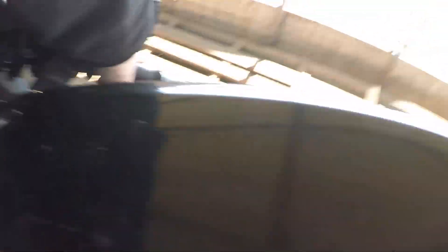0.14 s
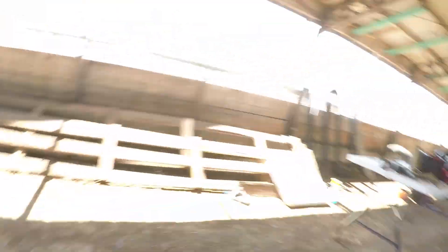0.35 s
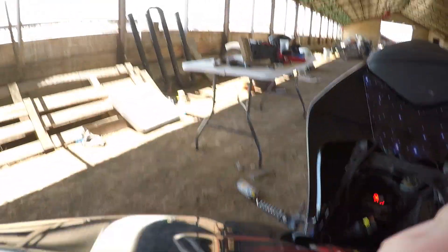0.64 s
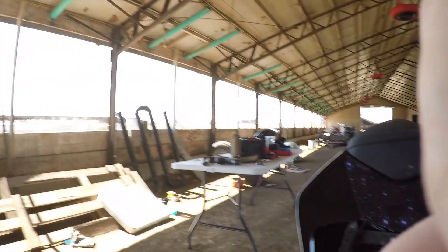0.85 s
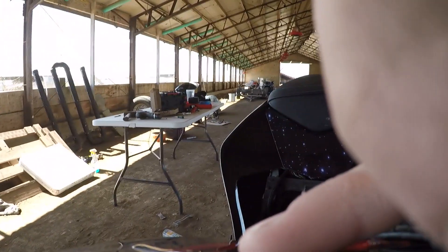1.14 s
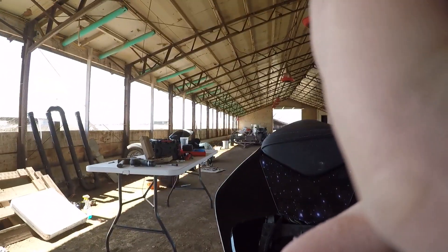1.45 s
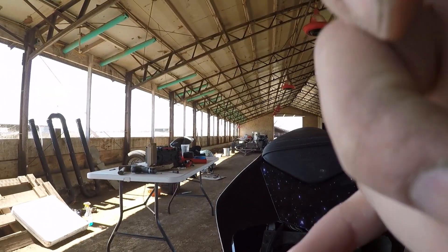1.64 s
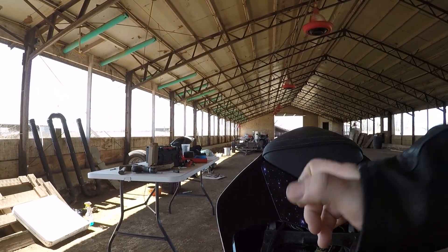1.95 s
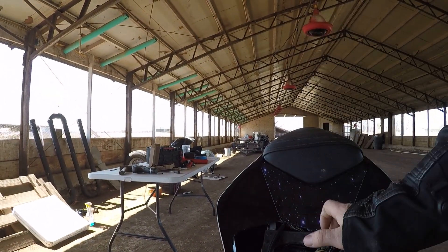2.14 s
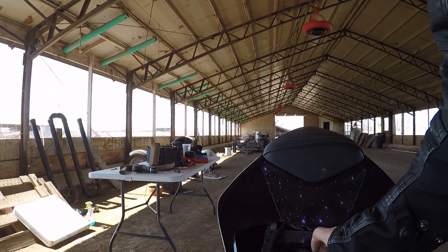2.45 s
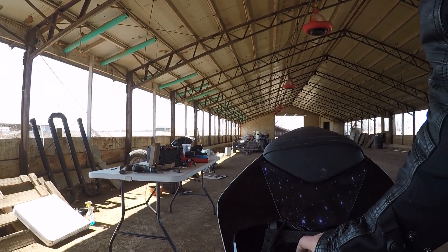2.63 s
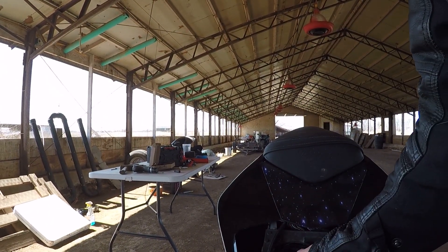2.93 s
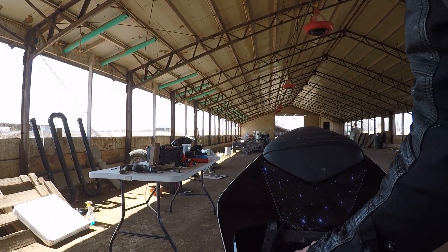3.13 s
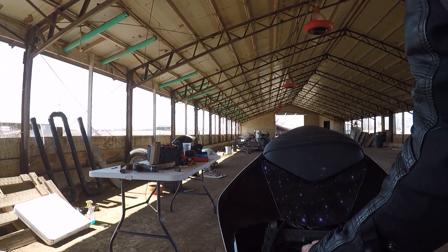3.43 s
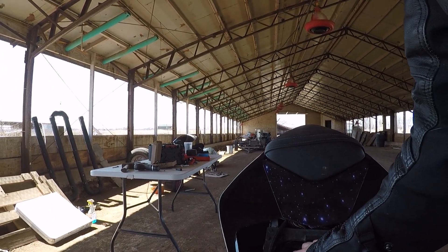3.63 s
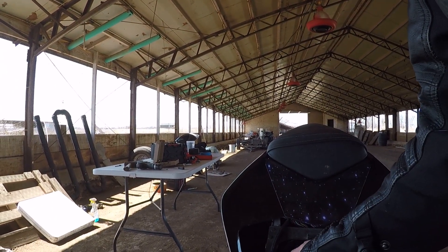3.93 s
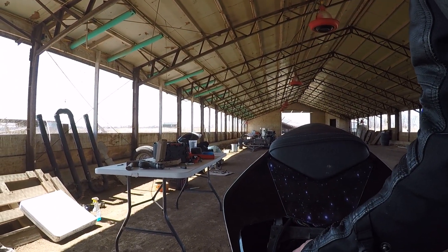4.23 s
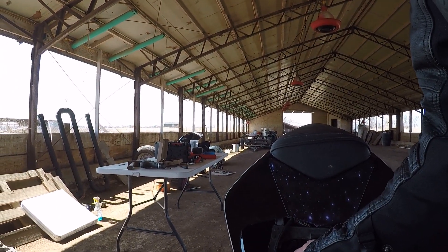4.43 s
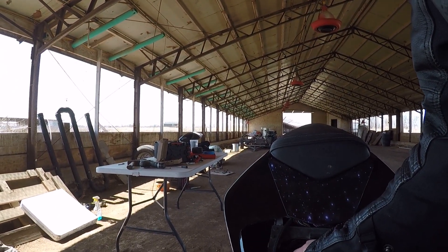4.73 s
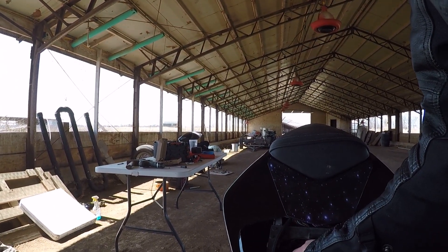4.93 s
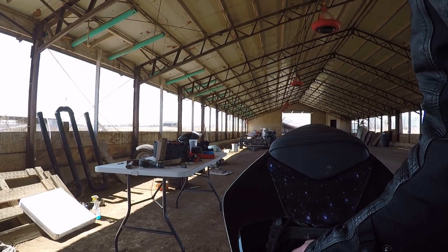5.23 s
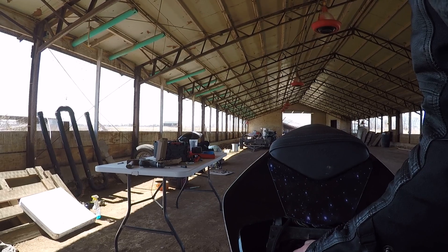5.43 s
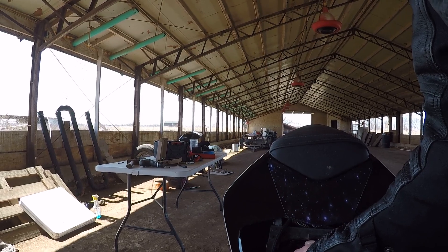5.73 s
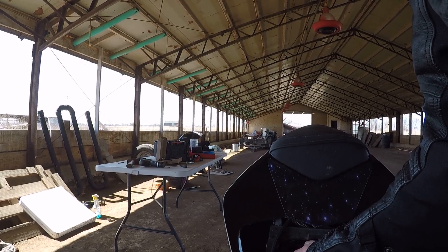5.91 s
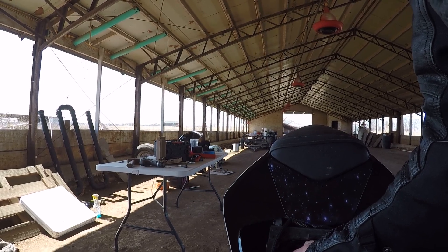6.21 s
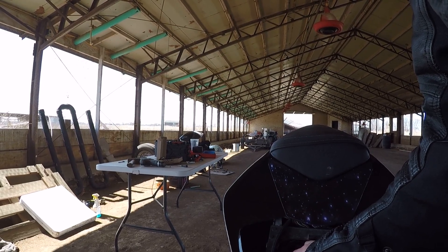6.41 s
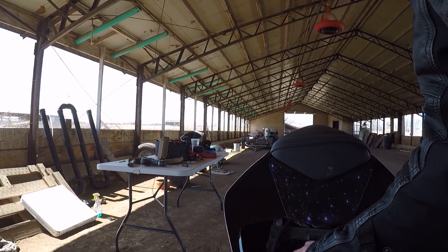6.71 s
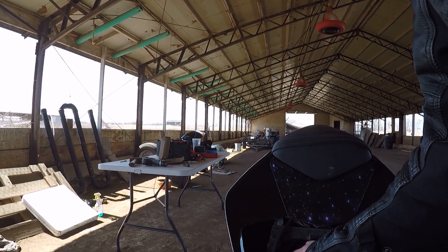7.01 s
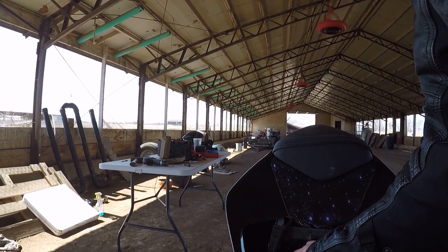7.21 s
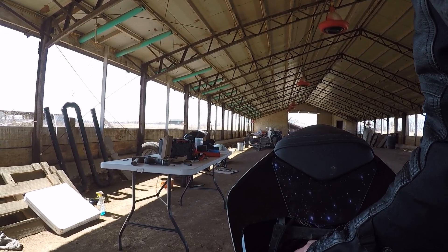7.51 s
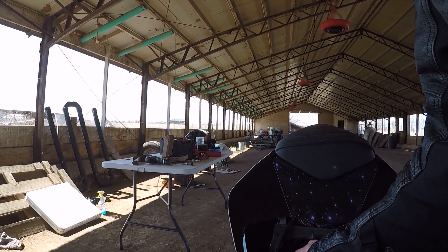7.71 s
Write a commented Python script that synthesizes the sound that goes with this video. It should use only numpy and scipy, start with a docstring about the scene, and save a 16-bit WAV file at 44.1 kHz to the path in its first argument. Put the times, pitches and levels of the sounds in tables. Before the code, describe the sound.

A four-cylinder motorcycle is already running at 0 seconds and holds a fast idle of about 3700 rpm to the end, near 7.8 seconds, with only tiny wavers in pitch. The strongest tone is a low hum near 123 Hz, roughened by uneven burble, a loose lope and a dull, dark wash from the long open barn. Softer rasp, piston knock, valve tick, gear whirr and faint whine sit above it. Until about 0.55 seconds air rumbles on the turning microphone, fading by 0.7; a sleeve swishes at 0.19. From 0.7 to 0.81 cloth crackles and a dense flurry of sharp, dry clicks strikes the housing, strongest near 0.74. A very faint brush comes at 1.07. The clatter opens up around 1.4 seconds, stays clearest until about 3.4, then gradually softens a little. The engine never revs up or stops.

```python
"""The exhaust of a four-cylinder motorcycle drones at a steady fast idle, about 3700 rpm, in a long open barn,
heard from the rider's seat: a sum of crank orders, with a burble of uneven burns that ring the pipe and the barn.
Above it noise bursts locked to the crank make rasp, piston knock and valve tick, over gear whirr and whine.
Early on the microphone is swung round and air buffets it; a sleeve brushes it in short strokes of coloured noise,
and the cuff clicks on the housing as cracks with very short rings."""
import sys
import numpy as np
from scipy import signal
from scipy.fft import rfft, irfft
from scipy.io import wavfile
from scipy.ndimage import uniform_filter1d, minimum_filter1d

SR = 44100
rng = np.random.default_rng(int(sys.argv[2]) if len(sys.argv) > 2 else 0)


def generate_wav(signal):
    """Clip the signal to [-1, 1] and save it as 16-bit WAV at the path in sys.argv[1]."""
    frames = np.transpose(np.atleast_2d(signal))
    scaled = np.clip(frames, -1, 1) * 32767
    pcm = np.round(scaled).astype(np.int16)
    wavfile.write(sys.argv[1], SR, pcm)


N = 346626

# Mean crankshaft speed. Each row: time in seconds, speed in turns per second.
CRANK_SPEED = [(0.0, 63.15), (0.53, 62.12), (0.8, 62.65), (1.01, 61.7), (1.19, 62.04), (2.35, 60.71),
               (2.61, 61.57), (2.85, 61.36), (4.28, 61.49), (4.38, 60.4), (4.76, 61.58), (5.7, 61.29),
               (5.87, 60.69), (6.02, 61.31), (6.18, 61.05), (6.5, 62.3), (7.54, 62.16), (7.85, 61.41)]
# Orders of the steady exhaust note. Each row: multiple of the crank rate, level in dB within its register.
NOTE_ORDERS = [(0.5, -42), (1, -13), (1.5, -8.5), (2, 4), (2.5, -11), (3, -9.5), (3.5, -26), (4, -18.5),
               (4.5, -23), (5, -8.5), (5.5, -42), (6, -5.5), (6.5, -36), (7, -22), (7.5, -36), (8, -17),
               (8.5, -32), (9, -61.5), (9.5, -23.5), (10, -12.5), (10.5, -31.5), (11, -38), (11.5, -47),
               (12, -33)]
# Faint higher orders of the note. Each row: multiple of the crank rate, level in dB within its register.
OVERTONE_ORDERS = [(14, -36.5), (16, -31), (20, -37), (24.5, -43.5)]
# Registers of the note, from the firing tone up to the overtones. Each row: level in dB, swell on the standing
# wave in dB, rise in dB per turn per second, lift in dB while the microphone faces the rear.
NOTE_REGISTERS = [(-12.0, -0.4, 0.6, -0.5), (-19.4, 2.4, 0.4, -1.5), (-24.0, -5.2, 1.2, -2.5),
                  (-30, -10, -0.8, 8.5), (-40.5, -0.5, 0.8, -2), (-42.5, -2, 1.5, -22)]
# How unevenly each cylinder burns. Each entry, in firing order: size of its surplus or lack in dB.
BURN_UNEVENNESS_DB = [-12.5, -7.5, -12, -8]
# Pipe and silencer resonances. Each row: frequency in Hz, width in Hz, relative gain in dB.
PIPE_RESONANCES = [(75.4, 20.5, 3.5), (111, 87, -6), (171.5, 18, -3.5), (226.3, 21, -14.5),
                   (253.2, 15.5, -5), (353.3, 4.1, -9.5), (451, 28, -18), (575, 14, -11.5), (626, 16, -12)]
# Side tones of the lope, a quarter order beside the crank orders. Each row: multiple of the crank rate, level in dB.
LOPE_SIDE_TONES = [(1.25, -28), (1.75, -26), (2.25, -23), (3.75, -40.5), (4.25, -30), (4.75, -47.5),
                   (5.75, -46.5), (6.25, -54), (7.25, -45.5), (8.25, -40.5), (9.25, -44.5)]
# The barn's answer to the uneven burns. Each row: frequency in Hz, relative density in dB per Hz.
BARN_COLOUR = [(15, -26.5), (35, -24.5), (60, -1), (90, -0.5), (130, 0), (250, -12), (400, -12.5),
               (500, -17), (700, -23.5), (1100, -56), (3000, -100)]

# Clatter at the seat, muffled at first behind the rider's arm; each part follows its swings about the mean
# to its own degree. Each row: time in seconds, level in dB.
CLATTER_LEVEL = [(0.9, -52), (1.32, -49), (1.45, -44.5), (3.38, -43), (6.34, -47.5), (6.78, -46.5),
                 (7.25, -47.5), (7.8, -47.5)]
# Treble of the clatter and whines. Each row: time in seconds, gain in dB.
CLATTER_TREBLE = [(0.18, -1.5), (0.3, -5.5), (0.58, -0.5), (0.72, -0.5), (1.25, -2.5), (1.45, -2),
                  (4.4, -0.5), (6.95, 0.5), (7.3, -1.5), (7.8, -1.5)]
# Colours of gas rasp, piston knock, valve tick, valve snap and the whirr of gears and cam chain.
# Each row: frequency in Hz, relative density in dB per Hz.
RASP_COLOUR = [(410, -63.5), (700, 1), (751, -11), (789, -1.5), (982, -2), (1850, -20), (2300, -19),
               (2990, -49), (5060, -120)]
KNOCK_COLOUR = [(700, -32.5), (1300, -3.5), (2000, -8), (2180, -4.5), (2530, 4), (3100, -4), (3540, -1.5),
                (4130, -4), (4800, -31.5), (6240, -29.5), (10600, -120)]
TICK_COLOUR = [(2760, -29.5), (4400, -11), (4850, -8), (5300, -3), (5700, -3), (6250, -7.5), (6910, -4),
               (8100, -10), (10800, -22.5), (12500, -42), (16300, -60), (22000, -120)]
SNAP_COLOUR = [(900, -25.5), (1600, 3.5), (2500, 6), (3400, 1.5), (4800, -0.5), (6000, 7.5), (7200, -1),
               (8200, -16), (10500, -7.5), (12500, -18.5)]
WHIRR_COLOUR = [(700, -14.5), (1000, 1.5), (1300, 1.5), (1500, 4.5), (1700, -0.5), (1950, -2), (2600, -6.5),
                (3000, -5), (3450, -6.5), (3800, -10.5), (4350, -9.5), (4850, -13.5), (5300, -11),
                (5900, -21), (6500, -8.5), (7400, -15.5), (8200, -21), (10300, -34.5), (11500, -47.5)]
# How hard each cylinder rasps and knocks. Each entry, in firing order: relative force in dB.
RASP_FORCE_DB = [-4, 0, 0, -4]
KNOCK_FORCE_DB = [-1, 1, 0, -1]
# How hard each valve ticks and snaps through the two turns of a cycle. Each entry: relative force in dB.
TICK_FORCE_DB = [0, 0, 1, -1, 0, -3, 1, -1]
SNAP_FORCE_DB = [-1, 2, 0, -1]
# Lateness from the clearance of each piston and valve. Each entry: mean delay in seconds.
PISTON_DELAY_S = [0, 0, 0.0005, 0.00025]
TICK_DELAY_S = [0.0003, -0.0001, 0.0006, -0.0003, 0, -0.0003, 0.0001, -0.0003]
SNAP_DELAY_S = [0.0005, 0.0008, 0.0001, 0.0003]
# Faint whines of the gears. Each row: frequency in Hz, width in Hz, settled level in dB.
GEAR_WHINES = [(1980, 200, -57.5), (3420, 180, -58), (6900, 200, -65)]

# Shading between the two microphone ports. Each row: frequency in Hz, left over right in dB.
PORT_LEVELS = [(60, -4.5), (123, -1.5), (250, -5.5), (370, -8), (500, -13), (620, -13), (800, -4.5),
               (1400, -1), (2600, -0.5), (4200, -2.5), (5400, -8.5), (7000, -5), (10500, -3.5)]
# Phase between the ports. Each row: frequency in Hz, lead of the left in radians.
PORT_LEADS = [(60, -0.2), (125, -0.45), (250, 0), (400, 0), (495, 0.7), (600, 2.2), (1300, 2.3),
              (1900, 1.3), (2900, 1.6), (4300, 0.4), (4900, -3.0), (6300, -6.0)]
# How alike the ports hear diffuse sound. Each row: frequency in Hz, likeness from 0 to 1.
PORT_LIKENESS = [(100, 0.89), (500, 0.95), (1200, 0.71), (3000, 0.82), (5500, 0.65), (10000, 0.9)]
# Air buffeting the microphone. Each row: frequency in Hz, relative density in dB per Hz.
AIR_COLOUR = [(8, -16.5), (20, 21), (40, 13.5), (80, 15), (250, -61)]
# Sleeve brushes. Each row: time of the peak in seconds, level in dB, rise in seconds, fall in seconds,
# share of dull crackle from 0 to 1, left over right in dB.
SLEEVE_STROKES = [(0.186, -30.5, 0.023, 0.0073, 0.03, 9), (0.695, -39.5, 0.047, 0.08, 0.1, 8),
                  (0.736, -30.5, 0.0036, 0.0033, 0.6, -10), (0.762, -37, 0.0042, 0.006, 0.8, -12),
                  (0.783, -32, 0.0077, 0.0081, 0.8, -5), (0.795, -33, 0.0022, 0.0045, 1, 3),
                  (0.811, -32, 0.0014, 0.0036, 1, -8), (1.065, -44, 0.012, 0.013, 0.05, -1)]
# Colours of the cloth. Each row: frequency in Hz, relative density in dB per Hz.
SWISH_COLOUR = [(300, -10), (900, 6), (2500, -3.5), (4500, -7), (6500, -2.5), (9000, -11.5), (14000, -25.5)]
CRACKLE_COLOUR = [(300, -4), (900, -0.5), (1950, -17), (2500, 9), (3300, 4), (4500, -9.5), (7000, -2.5),
                  (12000, -32)]
# The cuff catching on the housing. Each row: start in seconds, level in dB, ring in Hz, left over right in dB.
CUFF_CATCHES = [(0.7294, -27, 5470, -8), (0.7328, -29, 6200, -5), (0.7362, -17, 3570, -9),
                (0.7386, -19.5, 5760, -5), (0.7454, -32, 6000, -3), (0.748, -25, 5600, -5),
                (0.7572, -26, 2640, -1), (0.7637, -30, 7000, -6), (0.783, -29, 7200, -3),
                (0.7882, -28, 2470, 0), (0.7975, -35, 5750, -6), (0.8077, -30, 2900, -3),
                (0.8112, -30, 2490, -3)]


def from_db(db):
    """Level is logarithmic: 20 dB is a factor of ten in amplitude."""
    return 10 ** (np.asarray(db) / 20)


def rms_one(x):
    """Power is the mean square: scale it to one."""
    return x / np.sqrt(np.mean(x ** 2) + 1e-20)


def in_time(rows):
    """Linear interpolation: the columns of a curve, sample by sample."""
    s, *columns = np.transpose(rows)
    return [np.interp(np.arange(N) / SR, s, c) for c in columns]


def per_bin(points):
    """Interpolation over log frequency: a table read at every spectral bin."""
    hz, value = np.transpose(points)
    bins_hz = np.arange(N // 2 + 1) * SR / N
    return np.interp(np.log(bins_hz + 1), np.log(hz), value)


def colour(x, spectrum):
    """Spectral shaping: weight every bin, then scale to unit rms."""
    return rms_one(irfft(rfft(x) * from_db(per_bin(spectrum)), N))


def drift(rate_hz):
    """Low-passed noise: a slow random course of unit rms, drawn every 40 samples."""
    r = np.exp(-80 * np.pi * rate_hz / SR)
    noise = rng.standard_normal(N // 40 + 2002)
    slow = signal.lfilter([1], [1, -2 * r, r * r], noise)[2000:]  # drop the filter's run-in
    return np.interp(np.arange(N) / 40, np.arange(len(slow)), rms_one(slow))


def stereo_noise():
    """Partial coherence: a mid and a side noise make the two ports alike to a given degree."""
    alike = per_bin(PORT_LIKENESS)
    mid, side = rfft(rng.standard_normal((2, N)))
    return irfft(np.sqrt(1 + alike) * mid + np.sqrt(1 - alike) * side * [[1], [-1]], N)


def resonance(x, hz, width_hz):
    """Damped oscillator: a pole pair with unit gain at its peak."""
    r = np.exp(-np.pi * width_hz / SR)
    numerator = np.array([1, 0, -1]) * (1 - r * r) / 2
    return signal.lfilter(numerator, [1, -2 * r * np.cos(2 * np.pi * hz / SR), r * r], x + 1e-18)


def moments(turns, count):
    """Phase locking: the samples at which an event falls, count times in each turn of the crank."""
    return np.flatnonzero(np.diff(np.floor(turns * count)) > 0)


def clicks(at, sizes):
    """Impulse train: single-sample pushes."""
    out = np.zeros(N)
    out[at] = sizes
    return out


def rearward():
    """Orientation: how far the microphone still faces the rear, 1 at first and fading to 0."""
    turning_s = 0.57
    return np.exp(-(np.arange(N) / SR / turning_s) ** 2)


def silencer_lead(multiple):
    """Dispersion: the silencer shifts each crank order ahead, in radians, the lowest most."""
    return 9.9 / multiple ** 2.3


def register_levels(speed):
    """Standing waves: near one crank speed some registers swell and others cancel; levels in dB."""
    standing_turns_per_s, width_turns_per_s = 61.44, 0.2
    off = speed - standing_turns_per_s
    nearness = 1 / (1 + (off / width_turns_per_s) ** 2)
    return [db + swell_db * nearness + rise_db * off + lift_db * rearward()
            for db, swell_db, rise_db, lift_db in NOTE_REGISTERS]


def exhaust_note(turns, register_db, waver_db):
    """Fourier synthesis: crank orders add up to pressure pulses."""
    multiples, levels_db = np.transpose(NOTE_ORDERS + OVERTONE_ORDERS)
    register = np.digitize(multiples, [3.25, 7.25, 8.75, 11.75, 13])
    out = np.zeros(N)
    for k, level_db in enumerate(register_db):
        lines = np.zeros(N)
        for m, db in zip(multiples[register == k], levels_db[register == k]):
            # the cylinders differ more in timing than in strength, so the half orders alternate in sign
            sign = (-1) ** int(m) if m % 1 else 1
            level = from_db(db + waver_db * np.sqrt(m) * drift(22.0))
            lines += sign * level * np.cos(2 * np.pi * m * turns + silencer_lead(m))
        out += from_db(level_db) * rms_one(lines)
    return out


def uneven_burns(turns, rebound):
    """Negative feedback: a weak burn leaves fuel for a strong one two turns later; one push per surplus or lack."""
    at = moments(turns, count=2)
    memory = np.r_[1, np.zeros(len(BURN_UNEVENNESS_DB) - 1), rebound]
    surplus = np.tanh(2 * signal.lfilter([1], memory, rng.standard_normal(len(at))))
    return clicks(at, surplus * from_db(np.resize(BURN_UNEVENNESS_DB, len(at))))


def burble(puffs, top_hz, bottom_hz):
    """Resonators in parallel: the uneven burns ring the pipe and the silencer."""
    pipe = np.zeros(N)
    for k, (hz, width_hz, db) in enumerate(PIPE_RESONANCES):
        pipe += (-1) ** k * from_db(db) * resonance(puffs, hz, width_hz)
    pipe = signal.sosfilt(signal.butter(3, bottom_hz, "high", fs=SR, output="sos"), pipe)
    return rms_one(signal.sosfilt(signal.butter(6, top_hz, fs=SR, output="sos"), pipe))


def lope_tones(turns, wander, swell_db, waver_db):
    """Phase modulation: firings early and late once in four turns put quadrature tones above and below each order."""
    out = np.zeros(N)
    for m, db in LOPE_SIDE_TONES:
        side = np.sign(np.sin(2 * np.pi * m))  # upper and lower tones wander in opposite ways
        level = from_db(db + waver_db * drift(2.8)) * np.sqrt(2)
        out += level * np.sin(2 * np.pi * m * turns + side * wander + silencer_lead(m))
    return out * rms_one(from_db(swell_db * drift(3.4)))


def barn(x):
    """Reverberation: convolution with dense, dull noise that decays exponentially."""
    t60_s = 1.38
    tail = stereo_noise() * from_db(-60 * np.arange(N) / SR / t60_s)
    return colour(irfft(rfft(x) * rfft(tail), N), BARN_COLOUR)


def contacts(turns, spectrum, count, decay_s, scatter_db, surge_db, jitter_s, bed_db, force_db=(0,), delay_s=(0,)):
    """Impact noise: short bursts locked to the crank, no two alike, over a steady bed of the same colour."""
    at = moments(turns, count)
    chance = rng.standard_normal((len(at), 2))
    late_s = np.resize(delay_s, len(at)) + jitter_s * chance[:, 0]
    at = np.clip(at + (SR * late_s).astype(int), 0, N - 1)
    sizes = from_db(np.resize(force_db, len(at)) + scatter_db * chance[:, 1])
    blows = clicks(at, sizes) * from_db(surge_db * drift(26))
    r = np.exp(-1 / (decay_s * SR))
    bursts = rms_one(signal.lfilter([1], [1, -2 * r, r * r], blows + 1e-18))
    return colour(stereo_noise() * np.hypot(bursts, from_db(bed_db)), spectrum)


def rasp(turns, lope, swing_db):
    """Turbulent gas flow: noise bursts twice a turn, their level tied to the lope."""
    bursts = contacts(turns, RASP_COLOUR, count=2, decay_s=.0007, scatter_db=1.2, surge_db=.8, jitter_s=.00012,
                      bed_db=1, force_db=RASP_FORCE_DB, delay_s=PISTON_DELAY_S)
    return from_db(-39 + 0.68 * swing_db - 0.4 * lope - 3 * rearward()) * bursts


def knock(turns, swing_db):
    """Impact: pistons knock twice a turn."""
    bursts = contacts(turns, KNOCK_COLOUR, count=2, decay_s=.0005, scatter_db=1.2, surge_db=.8, jitter_s=.0001,
                      bed_db=-4, force_db=KNOCK_FORCE_DB, delay_s=PISTON_DELAY_S)
    return from_db(-49 + 1.95 * swing_db) * bursts


def tick(turns, swing_db):
    """Impact across a clearance: valves tick four times a turn."""
    bursts = contacts(turns, TICK_COLOUR, count=4, decay_s=.0005, scatter_db=1.3, surge_db=1.1, jitter_s=.00012,
                      bed_db=-1, force_db=TICK_FORCE_DB, delay_s=TICK_DELAY_S)
    return from_db(-49.5 + 0.94 * swing_db) * bursts


def snap(turns, swing_db):
    """Impact on closing: valves snap shut halfway between firings."""
    bursts = contacts(turns + 1 / 4, SNAP_COLOUR, count=2, decay_s=.00025, scatter_db=1.8, surge_db=1.3,
                      jitter_s=.0001, bed_db=-3.5, force_db=SNAP_FORCE_DB, delay_s=SNAP_DELAY_S)
    return from_db(-56 + 2.4 * swing_db) * bursts


def whirr(turns, swing_db):
    """Meshing noise: gears and cam chain run on as a bed with faint pulses."""
    bursts = contacts(turns, WHIRR_COLOUR, count=2, decay_s=0.0056, scatter_db=1.5, surge_db=3, jitter_s=0.0003,
                      bed_db=10)
    return from_db(-43.5 + 0.068 * swing_db + 3.5 * rearward()) * bursts


def clatter(turns, lope):
    """Superposition: the mechanical noises add, each following the level at the seat to its own degree."""
    level_db, = in_time(CLATTER_LEVEL)
    swing_db = level_db - np.mean(CLATTER_LEVEL, axis=0)[1]
    return (rasp(turns, lope, swing_db) + knock(turns, swing_db) + tick(turns, swing_db)
            + snap(turns, swing_db) + whirr(turns, swing_db))


def whines():
    """Narrow-band excitation: gear teeth keep a few resonances of the casing singing."""
    mesh = stereo_noise()
    singing = sum(from_db(db) * rms_one(resonance(mesh, hz, width_hz)) for hz, width_hz, db in GEAR_WHINES)
    return from_db(5 * rearward()) * singing


def shaded(x):
    """A time-varying high shelf: the treble dulls and brightens again."""
    treble_db, = in_time(CLATTER_TREBLE)
    top = irfft(rfft(x) * per_bin([(2000, 0), (4000, 1)]), N)
    return x + (from_db(treble_db) - 1) * top


def ports(x):
    """Diffraction: the housing shades the left port and shifts its phase against the right one."""
    balance, phase = from_db(per_bin(PORT_LEVELS)), per_bin(PORT_LEADS)
    response = np.array([balance * np.exp(1j * phase), np.ones_like(balance)]) * 2 / (1 + balance)
    return irfft(rfft(x) * response, N)


def buffet():
    """Wind noise: air rumbles on the swung microphone, mostly its left port, then dies down to a faint draught."""
    swing_end_s, settle_s = 0.54, 0.13
    level_db, = in_time([(swing_end_s, -30), (swing_end_s + settle_s, -49)])
    rumble = colour(rng.standard_normal((2, N)), AIR_COLOUR)
    return from_db(level_db) * rumble * from_db([[2], [-3]])


def sleeve(grain_db):
    """Friction: cloth swishes over the housing and catches in small crackles."""
    t, swish, crackle = np.arange(N) / SR, np.zeros((2, N)), np.zeros((2, N))
    for s, db, rise_s, fall_s, share, pan_db in SLEEVE_STROKES:
        stroke = np.exp(-np.minimum(np.maximum((s - t) / rise_s, (t - s) / fall_s), 20))
        stroke = stroke * from_db([[db + pan_db / 2], [db - pan_db / 2]])
        swish += np.sqrt(1 - share) * stroke
        crackle += np.sqrt(share) * stroke
    catching = from_db(grain_db * drift(250))
    return swish * colour(stereo_noise(), SWISH_COLOUR) + crackle * colour(stereo_noise() * catching, CRACKLE_COLOUR)


def cuff():
    """Impact: each catch is a sharp crack on the housing with a very short ring at its own pitch."""
    crack_decay_s, ring_decay_s, ring_db = 0.00067, 0.0011, -3
    out, crack = np.zeros((2, N)), colour(stereo_noise(), SWISH_COLOUR)
    t = np.arange(SR // 20) / SR
    for s, db, hz, pan_db in CUFF_CATCHES:
        span = int(s * SR) + np.arange(len(t))
        ring = from_db(ring_db) * np.sin(2 * np.pi * hz * t) * np.exp(-t / ring_decay_s)
        click = crack[:, span] * np.exp(-t / crack_decay_s) + ring
        out[:, span] += from_db([[db + pan_db / 2], [db - pan_db / 2]]) * click
    return out


def scene():
    """Common drive: one crank drives every part of the engine."""
    speed, = in_time(CRANK_SPEED)
    turns = np.cumsum(speed * (1 + 0.00085 * drift(12.6))) / SR
    puffs = uneven_burns(turns + 0.07, rebound=0.6)  # burns lead by 0.07 turn
    wander = 1.66 * drift(1.92)  # radians: the lope keeps only loosely in step with the crank
    lope = np.cos(np.pi / 2 * turns + wander)
    note = exhaust_note(turns, register_levels(speed), waver_db=0.58)
    lumps = from_db(-19.5) * burble(puffs, top_hz=673, bottom_hz=52.0)
    lumps = lumps + lope_tones(turns, wander, swell_db=1.2, waver_db=2.0)
    # the burns even out as the crank runs faster: 2.4 dB less burble and lope per turn per second
    unsteady = from_db(-2.4 * (speed - speed.mean()))
    wash = from_db(-18.5) * barn(puffs)
    engine = note + unsteady * lumps + wash + shaded(clatter(turns, lope) + whines())
    return ports(engine) + buffet() + sleeve(grain_db=5.0) + cuff()


def limiter(x, ceiling_db, release_db_per_s):
    """Gain control: the gain ducks smoothly just ahead of each peak and then recovers."""
    over_db = np.maximum(20 * np.log10(np.abs(x).max(axis=0) + 1e-9) - ceiling_db, 0)
    ramp = release_db_per_s * np.arange(N) / SR
    gain_db = ramp - np.maximum.accumulate(over_db + ramp)
    ahead_db = minimum_filter1d(gain_db, size=301)
    smooth_db = uniform_filter1d(uniform_filter1d(ahead_db, size=151), size=151)
    return x * from_db(smooth_db)


def record(dry):
    """Limited range and bandwidth: peaks are held down and the top is cut by a steep low-pass."""
    cutoff_hz = 12700
    held = limiter(dry, ceiling_db=-.3, release_db_per_s=80)
    return signal.sosfilt(signal.ellip(8, .2, 70, cutoff_hz, fs=SR, output="sos"), held)


dry = scene()
out = record(dry)
generate_wav(out)
```